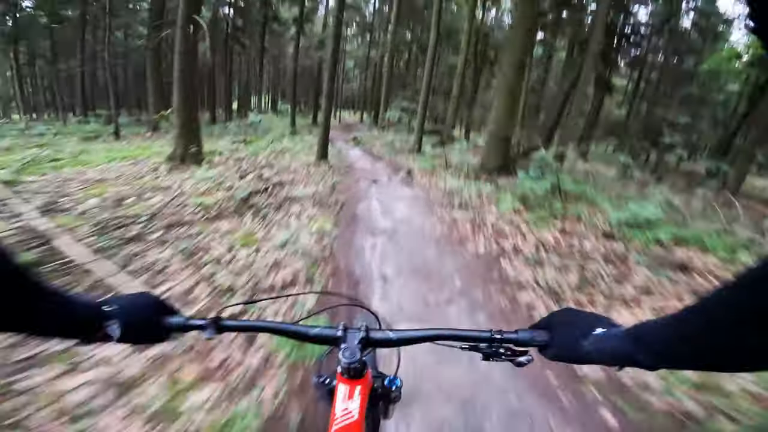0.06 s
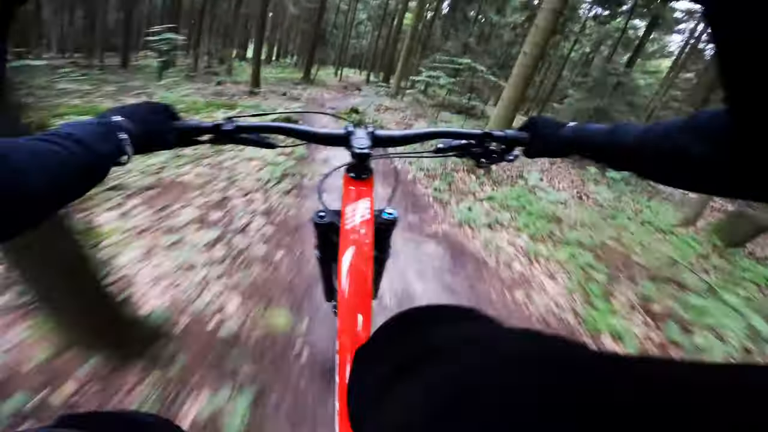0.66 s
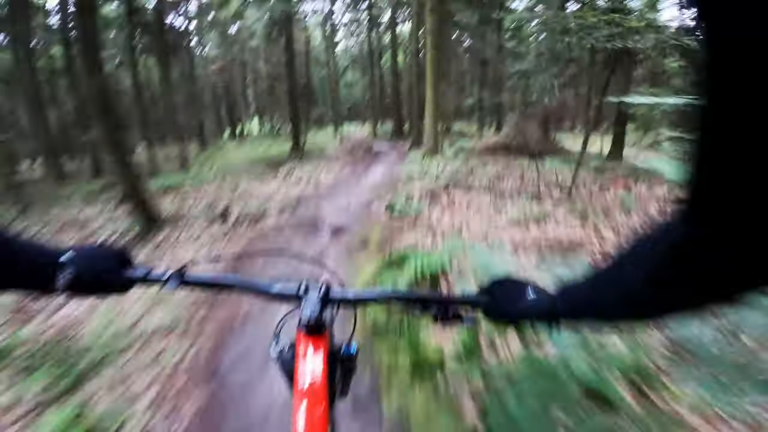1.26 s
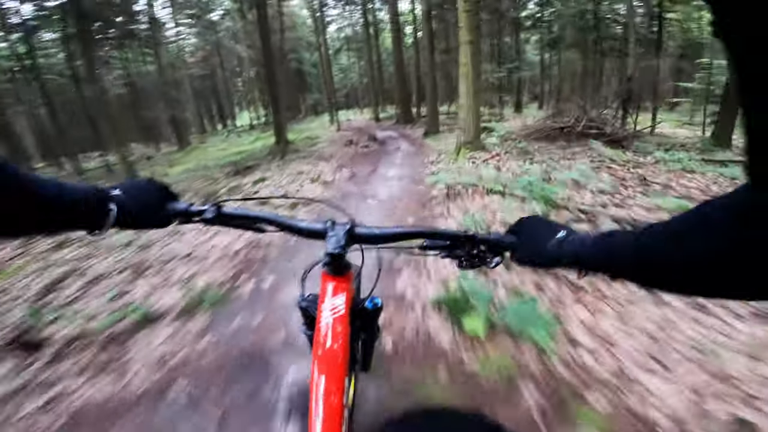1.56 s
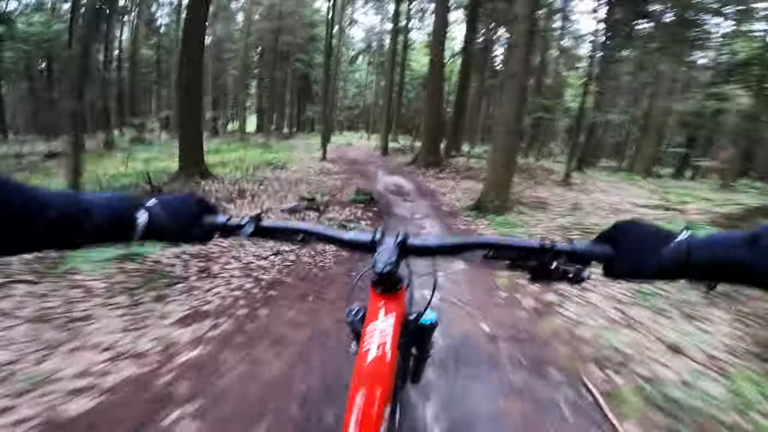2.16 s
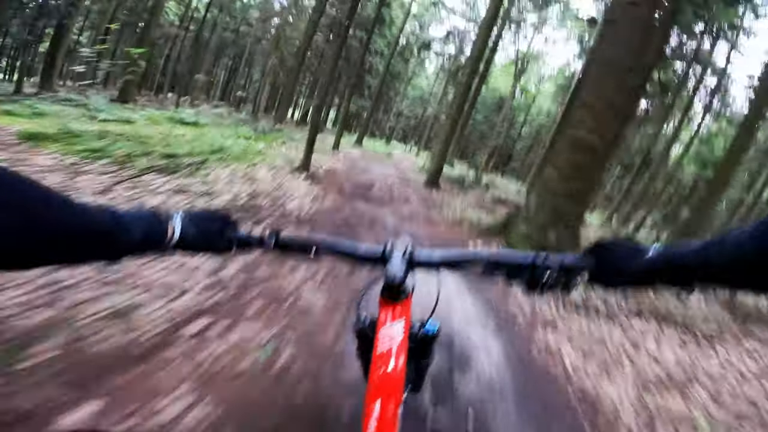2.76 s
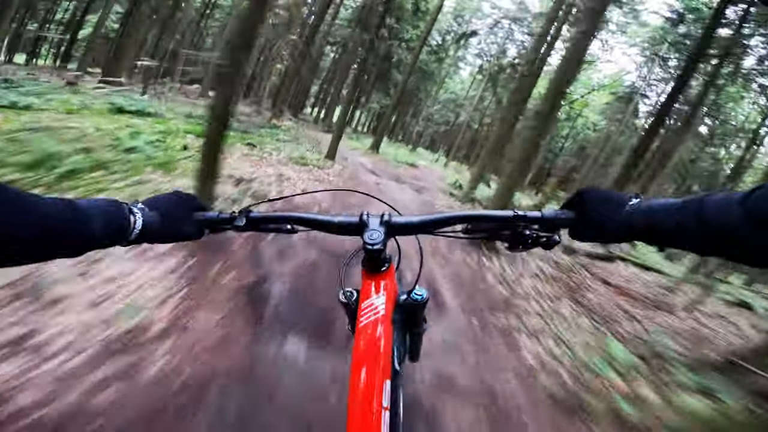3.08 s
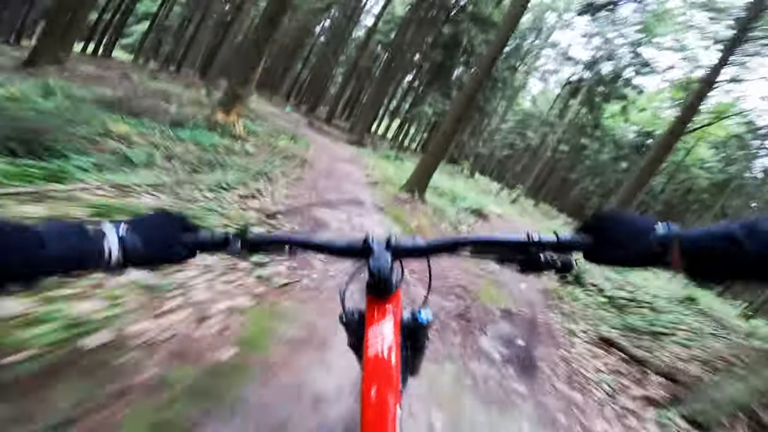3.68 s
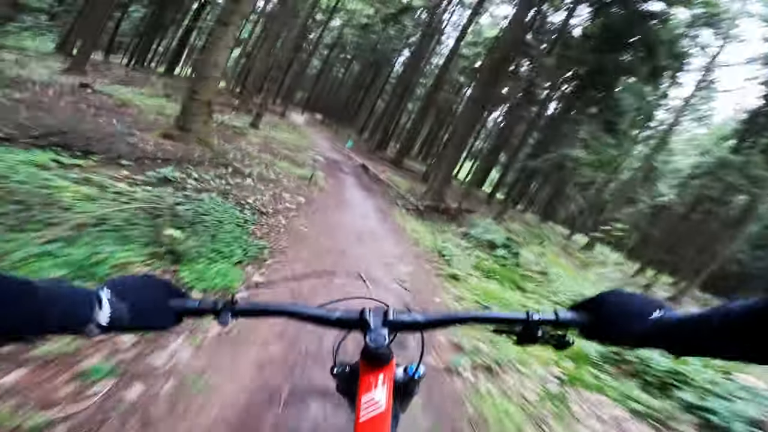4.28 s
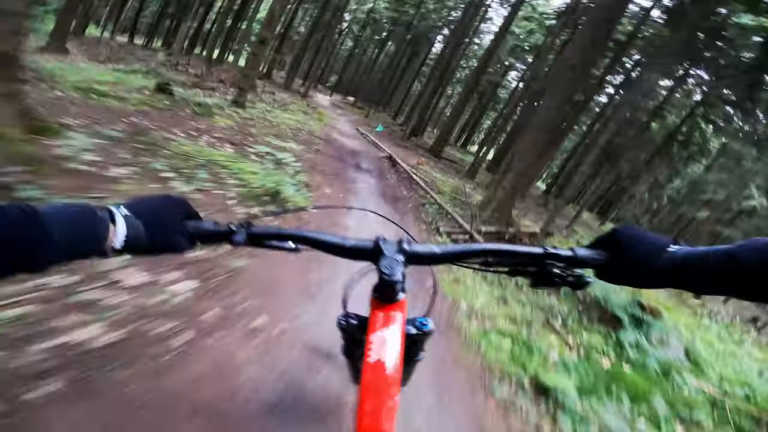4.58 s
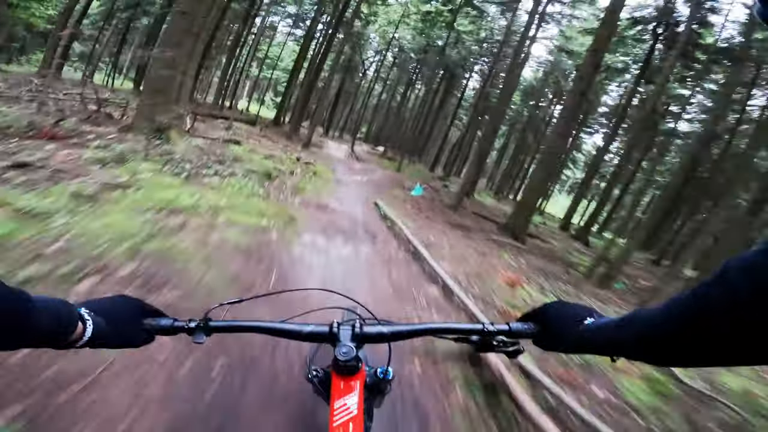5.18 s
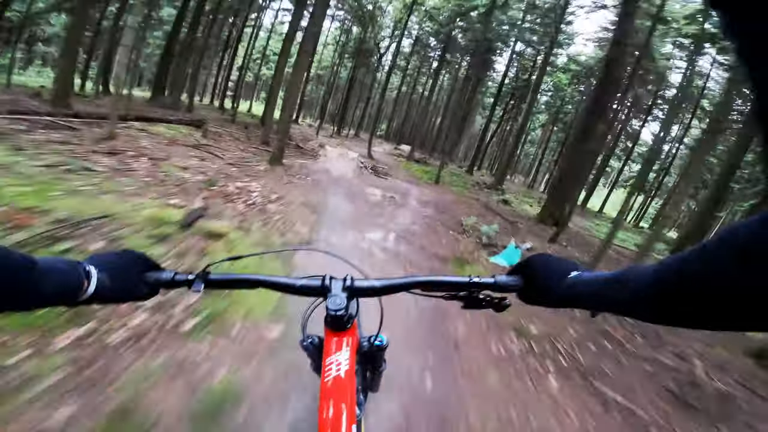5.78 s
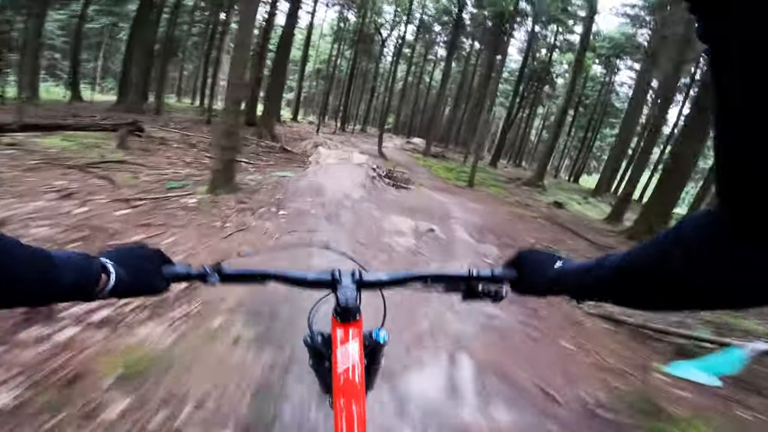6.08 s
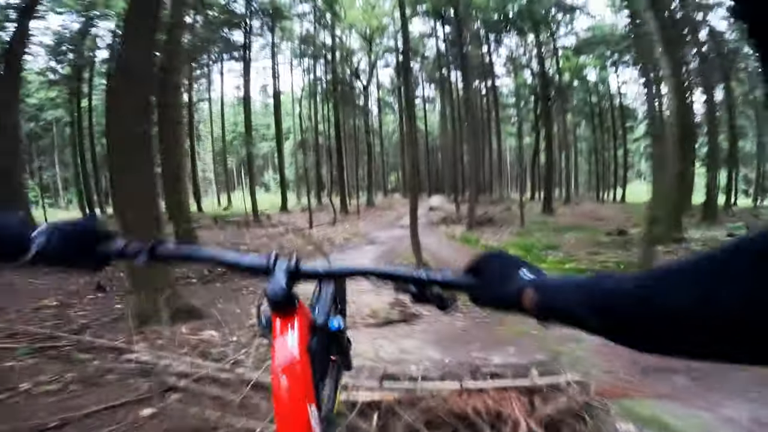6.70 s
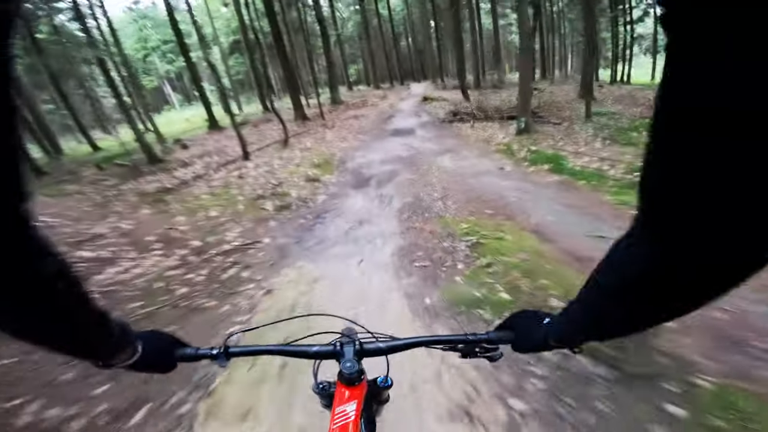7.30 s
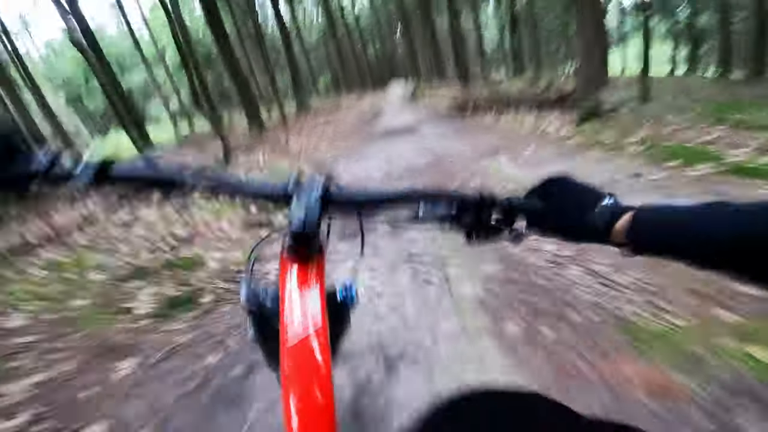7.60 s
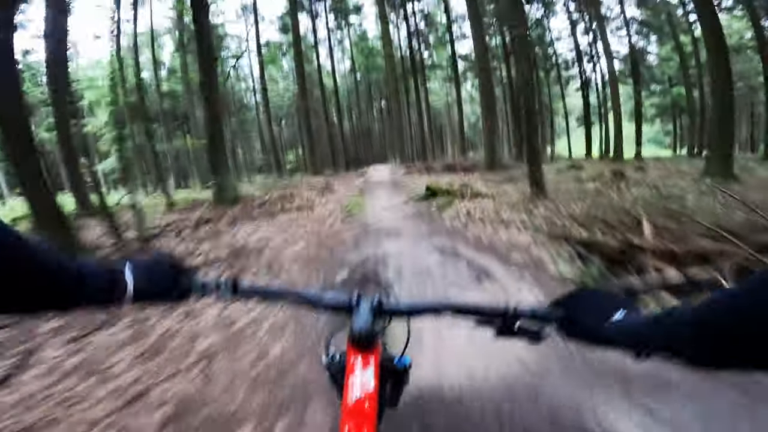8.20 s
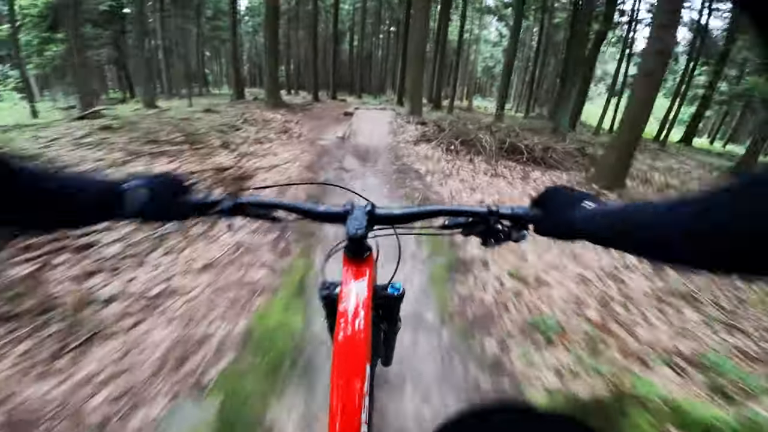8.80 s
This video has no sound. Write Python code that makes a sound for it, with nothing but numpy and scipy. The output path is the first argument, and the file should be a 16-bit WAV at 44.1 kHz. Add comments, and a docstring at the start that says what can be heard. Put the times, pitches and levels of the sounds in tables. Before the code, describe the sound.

Gusty wind rumbles on a body-worn microphone as a bike freewheels along a rough woodland path. Underneath, tyres roll and crackle over dirt and grit, with a thin, high ratcheting buzz from the rear hub. Irregular thuds, clacks and metallic chain slaps come in clusters. Late on, the rolling briefly eases as the bike leaves the ground, before a heavy run of bumps and more crunching. Everything is close and without echo.

```python
"""Mountain bike on a forest trail

A bike coasts down a dirt trail, heard from the rider's chest. Turbulent wind buffets the microphone.
Knobby tyres drum, hum and crunch over the ground, and the freehub's pawls ring its shell in a buzz.
Roots knock the frame into its modes and shake the chain and loose metal parts.
Near seven seconds the bike is briefly in the air and the ground noise drops."""
import sys
import numpy as np
from scipy import signal
from scipy.fft import rfft, irfft, next_fast_len
from scipy.io import wavfile
from scipy.ndimage import uniform_filter1d

SR = 44100
rng = np.random.default_rng(int(sys.argv[2]) if len(sys.argv) > 2 else 0)


def waveform_to_disk(signal):
    """Save audio, clipped to [-1, 1], as 16-bit WAV at the path in sys.argv[1]."""
    frames = np.transpose(np.atleast_2d(signal))
    scaled = np.clip(frames, -1, 1) * 32767
    samples = np.round(scaled).astype(np.int16)
    wavfile.write(sys.argv[1], SR, samples)


N = 390285
TIME = np.arange(N) / SR

# Spectrum of clacking stones and of scrapes. Each row: frequency in Hz, relative level in dB.
STONE_SPECTRUM = [(100, -58.5), (300, -3.5), (550, 4.5), (750, 1.5), (1050, 2), (1350, -0.5), (1550, -5),
                  (2000, -8), (2600, -6.5), (3100, -16.5), (5000, -18), (14000, -64)]


def undb(db):
    """Amplitude ratio of a level in decibels."""
    return 10 ** (np.asarray(db) / 20)


def unit(x):
    """Normalisation to an rms of 1."""
    return x / np.sqrt(np.mean(x ** 2) + 1e-18)


def steady(x, span_s):
    """Normalisation by the running rms: slow swells go, faster flutter stays."""
    return x / np.sqrt(np.abs(uniform_filter1d(x ** 2, int(span_s * SR) + 1)) + 1e-18)


def curve(table):
    """Linear interpolation in time through rows of seconds and value."""
    return np.interp(TIME, *np.transpose(table))


def wander(rate):
    """Random modulation of rms 1 that takes a new value rate times a second."""
    steps = rng.standard_normal(N // 20)
    return unit(np.interp(TIME * rate, np.arange(len(steps)), steps))


def hold(s, length, rise_s=0.055, fall_s=0.023):
    """Envelope that ramps to 1 from time s and decays exponentially after s + length."""
    return np.clip((TIME - s) / rise_s, 0, 1) * np.exp(-np.maximum(TIME - s - length, 0) / fall_s)


def add(track, s, sound):
    """Superposition of a sound on a track at time s."""
    start = max(int(s * SR), 0)
    part = sound[:max(N - start, 0)]
    track[start:start + len(part)] += part


def colour(x, spectrum):
    """Minimum-phase filter, built from an outline in Hz and dB by folding the cepstrum."""
    size = next_fast_len(2 * N) // 2 * 2
    hz, db = np.transpose(spectrum)
    bin_hz = np.arange(size // 2 + 1) * SR / size
    gain = undb(np.interp(np.log(bin_hz + 1), np.log(hz), db))
    cepstrum = irfft(np.log(gain))
    cepstrum[1:size // 2] *= 2
    cepstrum[size // 2 + 1:] = 0
    return irfft(rfft(x, size) * np.exp(rfft(cepstrum)))[:N]


def respond(force, spectrum):
    """Forced response of a body, scaled so that white noise keeps its power."""
    return colour(force, spectrum) / np.linalg.norm(colour(signal.unit_impulse(N), spectrum))


def resonate(x, hz, width_hz):
    """Second-order resonance with a gain of 1 at its centre."""
    return signal.lfilter(*signal.iirpeak(hz, hz / width_hz, fs=SR), x)


def resonate_twice(x, hz, width_hz):
    """Two equal resonances in cascade give a narrower peak with steeper skirts."""
    return resonate(resonate(x, hz, width_hz), hz, width_hz)


def grains(rate, spread_db):
    """Poisson process of tiny impacts, rate a second; the spread makes a few stand out."""
    struck = rng.random(N) < rate / SR
    return struck * rng.choice([-1, 1], N) * undb(spread_db * np.minimum(rng.exponential(size=N), 4))


def clatter(low_hz, high_hz, width_hz, rate, count):
    """Random impacts excite many small hard bodies, each at its natural frequency."""
    pitches = np.geomspace(low_hz, high_hz, count) * (1 + 0.0065 * rng.standard_normal(count))
    return unit(sum(resonate(grains(rate, spread_db=3.5), hz, width_hz) for hz in pitches))


def ping(db, hz, rise_s, fall_s):
    """Damped free vibration of a struck part with a close pair of modes."""
    t = TIME[:SR // 5]
    pair = np.sin(2 * np.pi * hz * t) + 0.16 * np.sin(2 * np.pi * hz * rng.uniform(1.1, 1.2) * t)
    return undb(db) * pair * (1 - np.exp(-t / rise_s)) * np.exp(-t / fall_s)


def strike(modes, db, centre_hz, rise_s, focus_octaves=0.33):
    """Modal response to a blow, strongest in the modes near the centre frequency."""
    t = TIME[:SR // 10, None]
    hz, fall_s = np.transpose(modes)
    weight = 1 / (1 + (np.log2(hz / centre_hz) / focus_octaves) ** 2)
    cycles = hz * (1 + 0.01 * rng.standard_normal(len(hz))) * t + rng.random(len(hz))
    rings = np.sin(2 * np.pi * cycles) * np.exp(-t / fall_s) * (1 - np.exp(-t / rise_s))
    return undb(db) * np.sqrt(2) * rings @ weight / np.linalg.norm(weight)


def scrape(db, rise_s, fall_s):
    """Sliding friction gives a burst of noise whose rms peaks at the given level."""
    t = TIME[:SR // 5]
    shape = (1 - np.exp(-t / rise_s)) * np.exp(-t / fall_s)
    return undb(db) * shape / shape.max() * rng.standard_normal(len(t))


def wind():
    """Turbulent pressure buffets the microphone in gusts; single eddies throb for a few cycles."""
    # Each row: time in seconds, buffeting level in dB.
    levels = [(0, -20), (0.6, -17.5), (1.9, -17), (2.7, -20.5), (3.05, -17), (3.55, -17.5), (4.2, -18.5),
              (4.8, -20), (5.65, -18), (5.95, -18), (6.65, -18), (7.25, -20), (7.55, -20), (7.76, -18.5),
              (7.95, -18.5), (8.2, -22), (8.85, -20)]
    # Each row: frequency in Hz, relative level of the turbulence in dB.
    spectrum = [(8, -1), (18, 2), (28, 0), (45, -3.5), (75, -8.5), (120, -13.5), (170, -18), (300, -33.5),
                (700, -38.5), (2000, -70), (14000, -120)]
    # Each row: centre in seconds, length in seconds, frequency in Hz, peak level in dB.
    eddies = [(0.42, 0.029, 105.3, -23), (0.873, 0.05, 88.4, -20.5), (1.25, 0.069, 70, -37),
              (2.895, 0.023, 150, -16.5), (3.5, 0.049, 90, -15), (4.701, 0.072, 79.5, -16.5),
              (4.854, 0.02, 134, -10.5), (5.883, 0.064, 101, -16.5)]
    air = steady(colour(rng.standard_normal(N), spectrum), span_s=0.149)
    air *= undb(curve(levels) + 1.45 * wander(rate=16))
    for s, length, hz, db in eddies:
        swell = np.exp(-((TIME - s) / (length / 2)) ** 2)
        air += undb(db) * swell * np.sin(2 * np.pi * (hz * TIME + rng.random()))
    return air


def ground_gains():
    """Smooth rolling and rough stretches add in power; gives gains of drumming, stones, sand and hum."""
    # The bike goes light or leaves the ground. Each row: start and length in seconds, change in dB.
    lifts = [(-0.04, 0.087, -6), (0.635, 0.04, -12), (3.055, 0.2, -3.5), (4.6, 0.044, -3.5),
             (5.354, 0.15, -4.5), (6.875, 0.67, -5), (8.617, 0.27, -2)]
    # Each row: start and length in seconds, then drumming, stones, sand with leaves and hum in dB.
    rough_stretches = [(0.07, 0.29, -28, -37, -47.5, -43), (0.335, 0.44, -36.5, -44, -45, -38),
                       (0.792, 0.71, -29, -34, -43.5, -48), (1.633, 0.46, -26.5, -33, -48.5, -41),
                       (2.098, 0.09, -35, -39.5, -43.5, -40), (2.5, 0.25, -28, -36, -53, -49),
                       (2.746, 0.23, -31, -39, -48, -55), (3.426, 0.6, -28.5, -38, -43.5, -35.5),
                       (4.134, 0.38, -28.5, -38.5, -45.5, -45), (4.762, 0.23, -23.5, -48, -42.5, -31.5),
                       (5.006, 0.28, -26, -39.5, -45, -53), (5.558, 0.23, -25.5, -33, -47.5, -42),
                       (5.856, 0.548, -55, -38, -62, -54), (6.156, 0.12, -31.5, -31, -52, -42),
                       (6.27, 0.24, -25, -33, -44, -33.5), (6.492, 0.29, -26.5, -31, -54, -29.5),
                       (7.389, 0.16, -26.5, -35, -45, -34), (7.53, 0.37, -25.5, -33, -45.5, -39),
                       (7.795, 0.25, -31.5, -42, -58, -45), (8.166, 0.26, -27, -33, -66, -42)]
    lift_db = sum(db * hold(s, length) for s, length, db in lifts)
    sand_lift_db = 0.056 * lift_db  # sand keeps flying off the tread
    rolling = undb([-31 + lift_db, -38.5 + lift_db, -44 + sand_lift_db, -49.5 + lift_db])
    rough_power = sum(np.outer(undb(levels) ** 2, hold(s, length) ** 2)
                      for s, length, *levels in rough_stretches)
    bumps = undb(wander(rate=26))
    return np.sqrt(rolling ** 2 + rough_power * bumps ** 2)


def tread_hum(click_hz):
    """Periodic contact of the knobs, two to each pawl click, gives harmonics that waver with slip."""
    # Each row: multiple of the knob rate, relative level in dB.
    harmonics = [(1, -17), (2, -2.5), (3, -38), (4, -16.5)]
    cycles = np.cumsum(2 * click_hz * (1 + 0.01452 * wander(rate=45))) / SR
    return unit(sum(undb(db + wander(rate=29)) * np.sin(2 * np.pi * k * cycles) for k, db in harmonics))


def gravel_crunch(jolt):
    """Dense impacts merge into shot noise where the tyres bite into loose gravel."""
    # Each row: start in seconds, length in seconds, level in dB.
    bites = [(0.823, 0.98, -51), (1.685, 0.36, -44.5), (5.564, 0.11, -39), (6.2, 0.22, -54),
             (6.353, 0.44, -42.5), (7.411, 0.11, -35), (7.517, 0.26, -38.5), (7.796, 0.2, -42.5),
             (8.13, 0.36, -42)]
    # Each row: frequency in Hz, relative level of the crunch in dB.
    spectrum = [(500, -36), (1300, -5), (1700, 0), (2500, 2.5), (3100, -8), (5000, -14), (14000, -77)]
    impacts = grains(rate=8000, spread_db=2.0) * undb(1.5 * jolt)
    gain = sum(undb(db) * hold(s, length) for s, length, db in bites)
    return steady(colour(impacts, spectrum), span_s=0.06) * gain


def tyres(click_hz):
    """Rolling noise: lumps drum the casings, stones clack, sand and leaves crunch, with shared jolts."""
    # Response of the casings. Each row: frequency in Hz, relative level in dB.
    drum_spectrum = [(70, -22.5), (150, -13), (190, -6), (212, 2.5), (238, 2.5), (262, -2), (305, 0),
                     (340, -2), (400, -2.5), (460, -0.5), (520, -5), (650, -15.5), (1000, -23.5),
                     (14000, -105)]
    # Sand and dry leaves. Each row: frequency in Hz, relative level in dB.
    sand_spectrum = [(600, -21.5), (1600, -1.5), (2700, 7), (3300, 7.5), (4200, 8.5), (5500, 3),
                     (6800, 2.5), (7700, 0.5), (8600, -6), (9600, -6.5), (11000, -12.5), (12400, -18),
                     (13500, -24), (15000, -62)]
    drum_gain, stone_gain, sand_gain, hum_gain = ground_gains()
    jolt = wander(rate=70)
    lumps = grains(rate=1300, spread_db=2.5)
    gravel = unit(grains(rate=5000, spread_db=2.5))
    gravel += undb(-6) * clatter(612, 3250, width_hz=85, rate=90, count=28)
    grit = unit(grains(rate=9000, spread_db=0))
    grit += undb(-10.5) * clatter(2964, 9370, width_hz=34, rate=40, count=24)
    drum = steady(colour(lumps * undb(0.96 * jolt), drum_spectrum), span_s=0.11) * drum_gain
    stones = steady(colour(gravel * undb(0.58 * jolt), STONE_SPECTRUM), span_s=0.12) * stone_gain
    sand = steady(colour(grit * undb(1.08 * jolt), sand_spectrum), span_s=0.11) * sand_gain
    hum = tread_hum(click_hz) * hum_gain
    crunch = gravel_crunch(jolt)
    clumps = unit(undb(1.1 * wander(rate=55)))  # stones lie in clumps
    return drum + hum + sand + (stones + crunch) * clumps


def tyre_cavity():
    """Cavity resonance: lumps ring the air inside the tyres while the rider's weight presses on them."""
    # Each row: start in seconds, length in seconds, level in dB.
    booms = [(2.498, 0.53, -31), (3.447, 0.56, -34), (4.137, 0.31, -32.5), (4.774, 0.46, -31.5)]
    air = resonate_twice(grains(rate=900, spread_db=1.0), hz=219, width_hz=43)
    return steady(air, span_s=0.17) * sum(undb(db) * hold(s, length) for s, length, db in booms)


def freehub(click_hz):
    """Pawls snapping over the ratchet drive the hub shell's resonances; at moments one pitch rings out."""
    # Each row: frequency in Hz, nominal width in Hz, relative level in dB.
    shell_modes = [(2607, 130, -4.5), (2865, 52, -2), (3610, 310, -8), (4240, 42, -2), (4500, 145, -4.5),
                   (4677, 108, 1), (4877, 70, -0.5), (5700, 90, -18), (6550, 140, -19), (7900, 120, -24),
                   (9380, 180, -23)]
    # Each row: time in seconds, level of the buzz in dB.
    levels = [(0, -42), (1.3, -48), (1.9, -47), (2.4, -49), (3.1, -47), (3.3, -48), (3.6, -49), (4.3, -46),
              (5.1, -47), (6.8, -42.5), (7.35, -46.5), (8.1, -47), (8.85, -42.5)]
    # Each row: centre in seconds, length in seconds, frequency in Hz, level in dB.
    surges = [(0.083, 0.078, 4960, -50), (0.41, 0.061, 4570, -46), (0.5, .05, 4350, -45),
              (0.64, 0.089, 4650, -59), (1.12, 0.1, 4900, -45), (2.444, 0.2, 4810, -47),
              (2.635, 0.074, 4680, -46), (2.792, 0.11, 4650, -47), (2.97, 0.22, 4780, -48),
              (5.15, .08, 4440, -43), (5.205, 0.05, 4730, -44), (5.33, 0.067, 4680, -53),
              (5.657, 0.062, 4670, -43), (5.83, 0.058, 4600, -48), (6.045, .04, 4850, -49),
              (6.2, .08, 4990, -45), (6.27, 0.12, 4300, -43.5), (6.358, 0.06, 4400, -45),
              (6.52, 0.083, 4630, -46), (6.63, 0.094, 4500, -50), (6.904, 0.078, 4700, -54),
              (6.947, 0.14, 3000, -45), (7.12, 0.088, 4670, -40.5), (7.196, 0.09, 4850, -47),
              (7.61, 0.049, 4300, -44), (7.645, 0.053, 4780, -38), (7.73, 0.045, 4930, -44),
              (7.785, 0.074, 4620, -41.5), (7.913, .07, 4640, -49), (7.99, .05, 4740, -47),
              (8.13, 0.095, 4640, -49), (8.28, 0.083, 4420, -40), (8.33, 0.069, 4180, -46),
              (8.783, 0.12, 4570, -64)]
    scatter_db, snap_s, drag = 2.2, 0.0012, 0.17
    clicks = np.cumsum(click_hz * (1 + 0.043 * wander(rate=90))) / SR
    since_click_s = clicks % 1 / click_hz
    strength = undb(scatter_db * rng.standard_normal(N // 100))[clicks.astype(int)]
    pawls = (strength * np.exp(-since_click_s / snap_s) + drag) * rng.standard_normal(N)
    shell = sum(undb(db + 2 * wander(rate=9)) * resonate_twice(pawls, hz, 2 * width)
                for hz, width, db in shell_modes)
    buzz = steady(shell, span_s=0.11) * undb(curve(levels) + 1.1 * wander(rate=12))
    for s, length, hz, db in surges:
        near = slice(*np.searchsorted(TIME, [s - length, s + length]))
        mode = steady(resonate_twice(pawls[near], hz, width_hz=300), span_s=0.055)
        swell = np.exp(-((TIME[near] - s) / (length / 2)) ** 2 / 2)
        buzz[near] += undb(db) * mode * swell
    return buzz


def knocks():
    """Impact excitation: a root or stone thumps the tyre, clacks through the frame and scrapes past."""
    # Each row: start in seconds, clack level in dB, thud level in dB, centre of the clack in Hz,
    # decay time of the scrape in seconds.
    hits = [(0.075, -24.5, -33, 1050, .012), (0.121, -18, -26, 824, .006),
            (0.142, -15.5, -22, 1470, 0.0028), (0.207, -24, -29, 1100, .005),
            (0.273, -16.5, -14, 1190, 0.0036), (0.294, -24, -32, 1210, 0.0087),
            (0.418, -25.5, -28, 2000, .012), (0.471, -28, -36, 1300, .002), (0.545, -23, -29, 900, 0.0018),
            (0.72, -37, -38, 1000, .003), (0.844, -25, -24, 1400, .006), (0.89, -20.5, -20, 800, .006),
            (0.948, -27, -29, 880, 0.0027), (0.975, -22, -33, 1190, 0.0026), (1.03, -24, -16, 600, 0.0066),
            (1.097, -25, -20, 800, 0.0065), (1.196, -24, -30, 1200, 0.0061),
            (1.226, -22, -31, 1200, 0.0055), (1.297, -20.5, -18, 1250, .005), (1.325, -27, -28, 1240, .005),
            (1.357, -22, -20, 1340, 0.0048), (1.428, -22.5, -18.5, 1300, 0.0066),
            (1.469, -18, -25, 1100, .003), (1.603, -27, -33, 900, 0.0033), (1.657, -22.5, -22, 700, 0.01),
            (1.678, -25, -14.5, 560, 0.01), (1.752, -25, -40, 750, .005), (1.802, -36, -21, 560, 0.0043),
            (1.871, -24, -32, 600, .004), (1.876, -20.5, -14, 930, 0.0048), (1.958, -21, -30, 1200, .005),
            (1.99, -18.5, -38, 1300, 0.011), (2.316, -29.5, -36, 1127, 0.0037),
            (2.373, -29, -39, 1200, .004), (2.526, -24.5, -15, 1300, .004), (2.586, -23, -24, 850, .003),
            (2.639, -31, -41, 1200, 0.0057), (2.927, -26, -30, 800, 0.0054), (3.217, -29, -20, 700, .003),
            (3.395, -24.5, -22, 690, 0.0039), (3.506, -33, -14, 560, .006), (3.581, -21, -23, 860, 0.0065),
            (3.684, -22, -25, 897, 0.0044), (3.759, -21, -26, 1200, 0.0044), (3.866, -24, -19, 750, 0.005),
            (3.886, -23, -29, 1100, .006), (3.958, -25, -20, 600, 0.017), (4.139, -34, -17.5, 1200, .005),
            (4.211, -23.5, -12.5, 1200, .007), (4.361, -26, -12.5, 670, 0.0073),
            (4.723, -28, -18.5, 610, .003), (4.938, -25.5, -40, 920, 0.011),
            (5.469, -28.5, -38, 1290, 0.0033), (5.535, -24, -40, 750, .003),
            (5.558, -23.5, -18, 704, 0.0076), (5.777, -23, -42, 1400, 0.0088), (6.385, -22, -21, 800, .007),
            (6.564, -24, -38, 930, .003), (6.659, -33, -15, 700, .007), (6.677, -25, -32, 1030, .005),
            (6.825, -30, -31, 1098, .009), (7.413, -26, -18, 900, 0.016), (7.456, -24, -16, 1090, 0.022),
            (7.556, -26, -18, 900, .006), (7.574, -30, -15, 560, .006), (7.597, -35, -14.5, 560, .006),
            (7.628, -26, -17, 900, 0.0065), (7.696, -26, -16, 1700, 0.0067), (8.228, -21, -16, 900, .004),
            (8.293, -23, -26, 900, .005), (8.361, -18.5, -13.5, 931, 0.008), (8.401, -29, -34, 1240, .006),
            (8.436, -27, -40, 1200, .004)]
    # Each row of both tables: natural frequency in Hz, decay time in seconds.
    casing_modes = [(135, 0.0066), (222, 0.015), (305, 0.0084), (390, 0.018), (462, 0.0093)]
    frame_modes = [(560, 0.019), (770, 0.0035), (920, 0.0036), (1060, 0.0022), (1240, 0.005),
                   (1370, 0.0015), (1690, 0.0018), (2040, 0.0065), (2470, 0.0077), (2900, .0025)]
    blows, scrapes = np.zeros((2, N))
    for s, clack_db, thud_db, hz, scrape_s in hits:
        add(blows, s, strike(casing_modes, thud_db, centre_hz=266, rise_s=0.0012))
        add(blows, s, strike(frame_modes, clack_db, centre_hz=hz, rise_s=0.0007))
        add(scrapes, s, scrape(clack_db - 3.5, rise_s=0.0007, fall_s=scrape_s))
    return blows + respond(scrapes, STONE_SPECTRUM)


def clanks():
    """Loose metal parts hit their stops and ring briefly at their natural frequencies."""
    # Each row: start in seconds, level in dB, frequency in Hz.
    hits = [(0.42, -30, 1960), (0.838, -34, 2440), (1.031, -27, 1455), (1.124, -26, 1640),
            (1.307, -35, 2740), (1.419, -33, 3270), (1.469, -34, 1840), (1.556, -34, 2670),
            (1.733, -33, 2580), (1.75, -32, 1940), (1.819, -32, 2310), (1.993, -33, 3940),
            (2.099, -28, 1445), (3.549, -35, 3015), (4.138, -33, 1960), (4.215, -34, 3360),
            (4.422, -30, 2500), (4.537, -34, 1810), (4.912, -29.5, 2610), (5.654, -30, 2380),
            (5.775, -34, 1980), (5.781, -35, 2770), (6.634, -28, 1890), (6.738, -34, 3530),
            (7.821, -31, 2510), (8.432, -31, 2160), (8.435, -38, 2900), (8.471, -37, 3530)]
    metal = np.zeros(N)
    for s, db, hz in hits:
        add(metal, s, ping(db, hz, rise_s=0.0008, fall_s=0.014))
    return metal


def chain():
    """Each slap is a cluster of collisions: a rattle, one clearly ringing link and fainter neighbours."""
    # Each row: time of the peak in seconds, reference level in dB, frequency of the link in Hz.
    slaps = [(0.111, -29, 4770), (0.426, -33, 5050), (0.883, -38, 7040), (1.009, -28, 5170),
             (1.068, -33, 5470), (1.126, -27.5, 5000), (1.19, -33, 4320), (1.274, -37, 4270),
             (1.372, -32, 5440), (1.418, -28, 5520), (1.453, -31, 6550), (1.486, -34, 6500),
             (1.722, -31.5, 5400), (1.747, -34, 5500), (1.869, -35, 7000), (1.925, -31, 6360),
             (1.94, -33, 5800), (1.959, -38, 5950), (1.997, -26.5, 4000), (2.007, -31, 6500),
             (2.06, -28, 4900), (2.104, -28, 4930), (2.108, -33, 6200), (2.13, -37, 6500),
             (3.509, -37, 8060), (3.542, -32, 4800), (3.636, -30, 6890), (3.869, -33, 5600),
             (3.912, -36, 5600), (3.931, -32, 5600), (3.975, -33, 6000), (3.99, -31, 6860),
             (4.206, -29, 5600), (4.423, -34.5, 6000), (4.471, -27.5, 6840), (4.537, -22, 3370),
             (4.542, -23.5, 5870), (4.595, -28.5, 5000), (4.605, -31, 7000), (5.777, -32, 5600),
             (6.742, -32, 5600), (7.558, -32.5, 5900), (7.688, -35, 5340), (7.732, -37, 8960),
             (8.439, -35, 5250), (8.478, -33, 4000), (8.488, -36, 5300)]
    # Each row: frequency in Hz, relative level of the rattle in dB.
    spectrum = [(100, -48), (700, -3), (2000, 11.5), (3800, 10.5), (5500, 11.5), (7300, 5), (9000, 0),
                (12000, -19), (15000, -28)]
    rattle_db, link_db, neighbour_db = -3, -6, -9.5  # relative to the slap
    rise_s, fall_s = 0.004, 0.0075
    link_envelope = dict(rise_s=0.0003, fall_s=0.008)
    rattle, links = np.zeros((2, N))
    t = TIME[:SR // 10] - TIME[SR // 40]  # zero at the peak
    swell = np.exp(np.minimum(t / rise_s, -t / fall_s))
    for s, db, hz in slaps:
        add(rattle, s + t[0], undb(db + rattle_db) * swell * rng.standard_normal(len(t)))
        add(links, s - rise_s / 2, ping(db + link_db, hz, **link_envelope))
        for late, detune in rng.standard_normal(size=(6, 2)):
            neighbour = ping(db + neighbour_db, hz * (1 + 0.12 * detune), **link_envelope)
            add(links, s + rise_s * late, neighbour)
    return respond(rattle, spectrum) + links


def scene():
    """Wind and bike superpose without reverberation; wheel speed sets the rates of hum and buzz."""
    # Rear wheel speed. Each row: time in seconds, pawl clicks per second.
    click_rates = [(0, 74.25), (1, 76), (2.2, 84.1), (2.8, 105.6), (3.6, 102.1), (4.6, 100), (5.1, 111.3),
                   (5.7, 114.4), (6.1, 104), (6.6, 113.4), (6.85, 101.9), (7.2, 96.3), (7.4, 94.9),
                   (7.8, 112.3), (8.3, 100.9), (8.85, 95.9)]
    click_hz = curve(click_rates)
    mix = wind() + tyres(click_hz) + tyre_cavity() + freehub(click_hz) + knocks() + clanks() + chain()
    return mix[None]


def record(dry):
    """Soft saturation rounds the loudest peaks, and a low-pass filter cuts the highest treble."""
    drive, cutoff_hz = 1.5, 15000
    low_pass = signal.ellip(8, 0.2, 70, cutoff_hz, fs=SR, output="sos")
    return signal.sosfilt(low_pass, np.tanh(drive * dry) / drive)


dry = scene()
out = record(dry)
waveform_to_disk(out)
```